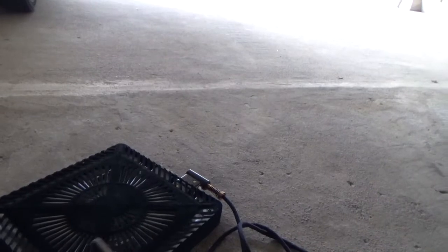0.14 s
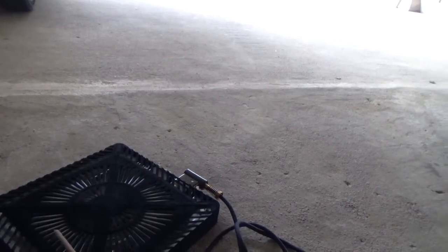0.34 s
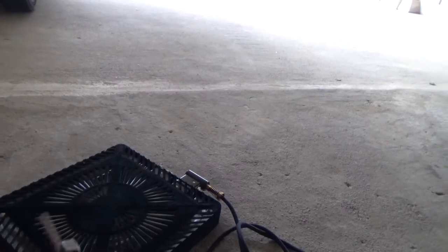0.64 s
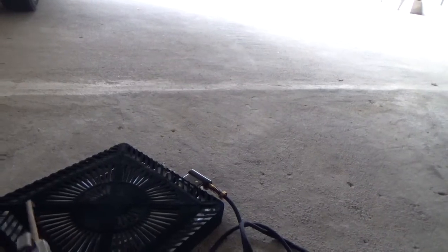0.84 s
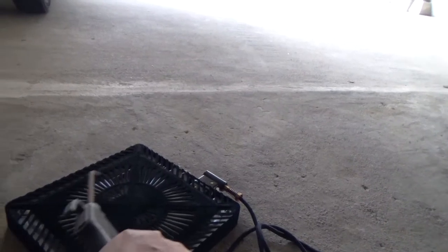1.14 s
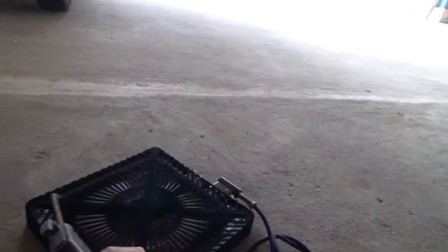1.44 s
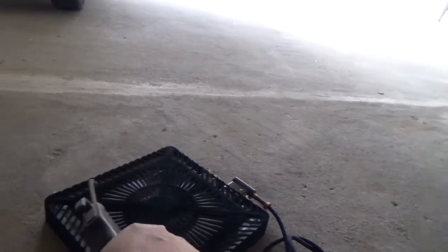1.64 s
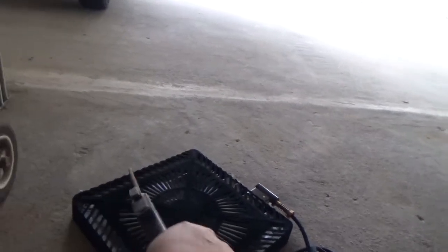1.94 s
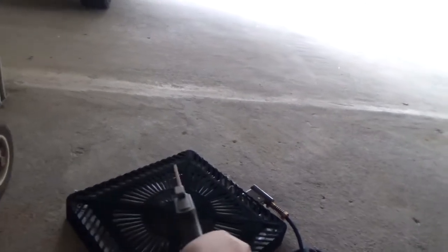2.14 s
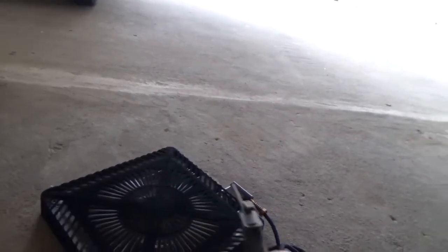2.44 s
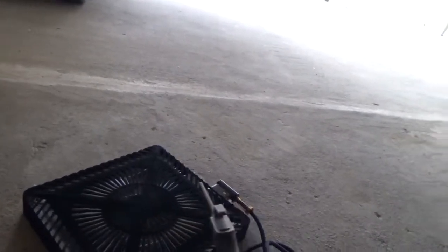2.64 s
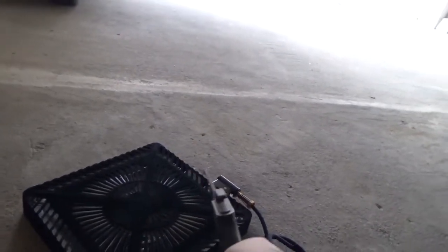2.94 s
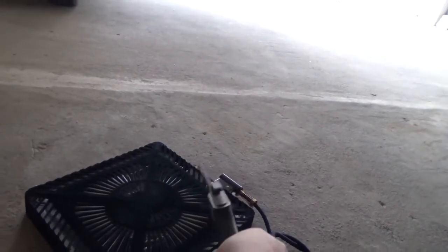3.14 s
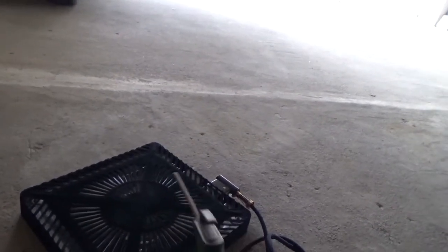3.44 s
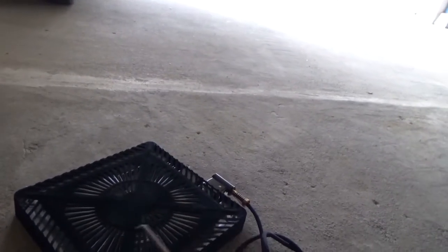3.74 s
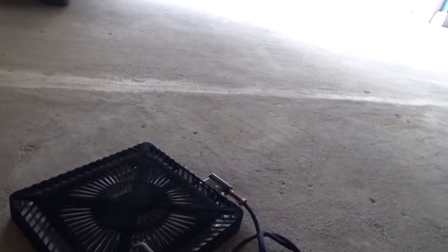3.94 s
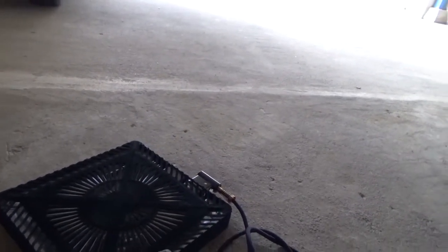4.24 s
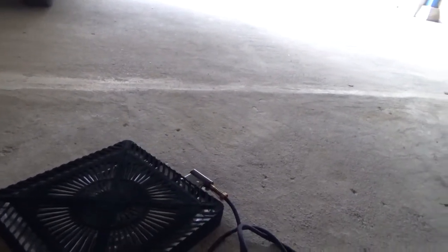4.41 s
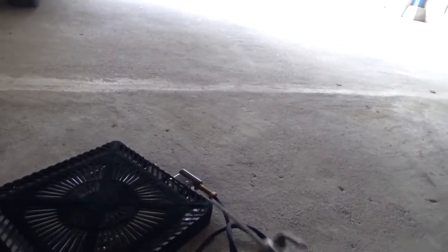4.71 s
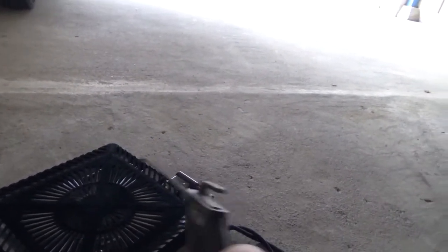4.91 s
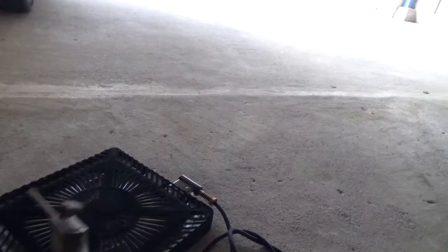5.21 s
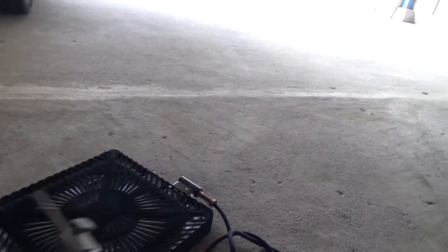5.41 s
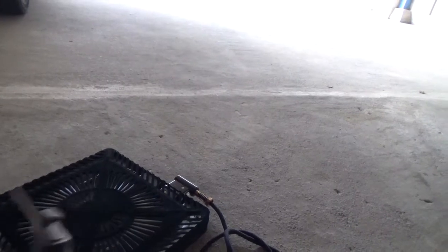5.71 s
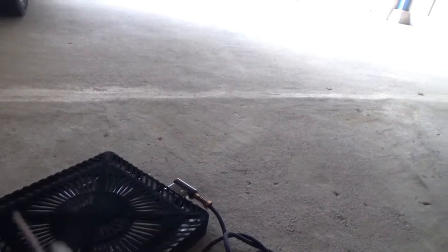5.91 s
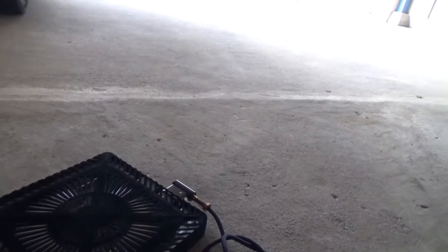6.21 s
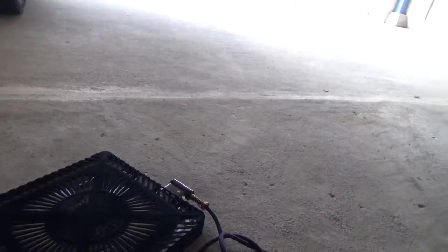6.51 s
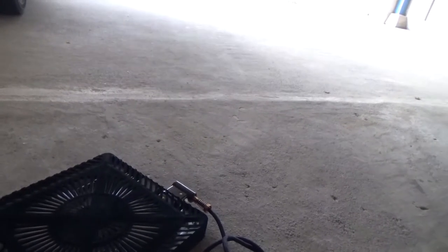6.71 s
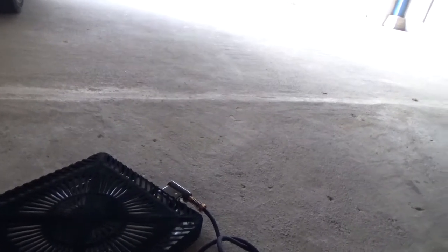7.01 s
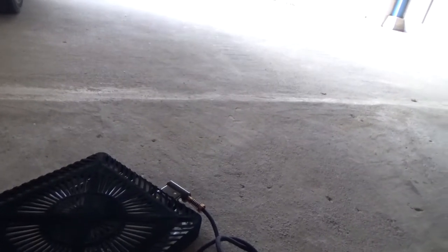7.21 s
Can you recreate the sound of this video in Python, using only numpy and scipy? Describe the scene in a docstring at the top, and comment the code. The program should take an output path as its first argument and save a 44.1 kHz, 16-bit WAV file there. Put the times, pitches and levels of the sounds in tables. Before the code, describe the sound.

Over a steadily chugging air compressor, a long, wavering blast of air hisses, stops briefly, then returns weaker.

```python
"""From the start a blow gun cleans a box fan on a garage floor, while a piston compressor chugs at
29 strokes a second. The turbulent jet hisses; swept over the fan, it rushes on the slats, excites
hollows of the housing, spits and briefly whistles on edges. At 6.6 s the trigger is let go, and at
6.9 s a weaker blast follows. Throughout, a gain control holds down the loud jet, so the compressor
ducks under the blasts."""
import sys
import numpy as np
from scipy import signal
from scipy.fft import rfft, irfft, next_fast_len
from scipy.io import wavfile
from scipy.ndimage import uniform_filter1d

SR = 44100
rng = np.random.default_rng(int(sys.argv[2]) if len(sys.argv) > 2 else 0)


def waveform_to_disk(signal):
    """Save audio, clipped to [-1, 1], as 16-bit WAV at the path in sys.argv[1]."""
    frames = np.transpose(np.atleast_2d(signal))
    scaled = np.clip(frames, -1, 1) * 32767
    samples = np.round(scaled).astype(np.int16)
    wavfile.write(sys.argv[1], SR, samples)


N = 324562
TIME = np.arange(N) / SR


def blow_gun():
    """Aerodynamic noise: turbulence radiates from the free jet and from the surfaces that it strikes."""
    # Spectra of free jet, slats, housing hollows and low roar: f/Hz, relative spectral density/dB
    jet = [(60, -63), (200, -67), (380, -23), (700, -21), (1100, -35), (1900, -25), (2600, -33),
           (3500, -46), (4500, -12.5), (6200, -6), (7400, 1.5), (8700, 4), (9800, 0.5), (10900, -5)]
    slats = [(60, -60), (200, -44), (380, -49), (700, -9), (1100, -26), (1900, -8.5), (2600, -3), (3500, 2),
             (4500, 2.5), (6200, 1.5), (7400, -3), (8700, -6.5), (9800, -22), (10900, -25)]
    hollow = [(200, -60), (700, -16.5), (1100, -5), (1450, -8), (1900, 0.5), (2600, -1), (3500, -3.5),
              (4200, -25), (7400, -5.5), (10900, -34)]
    roar = [(60, -38), (200, -22), (380, -9), (700, -5), (1100, 0), (1450, -2), (1900, -4), (2600, -5),
            (4500, -9), (8000, -9), (10900, -26)]
    # Slow drift as the hand moves the gun: t/s, hiss level/dB, fizz level re hiss/dB
    jet_levels = [(0, -12, 2.5), (.85, -12, 4), (1.1, -5.5, 1), (1.38, -8, 1), (1.5, -13, 3.5),
                  (1.9, -15, -1.5), (2.25, -10, 1), (2.8, -13.5, -0.5), (3.25, -14, -1), (3.68, -16, 3),
                  (3.95, -10, 1), (4.5, -12, 2.5), (4.78, -10, -2), (4.98, -20.5, 3), (5.8, -17.5, 7),
                  (6.1, -17.5, 3.5), (6.38, -23.5, 8.5), (6.95, -30, -4), (7.36, -29, -10)]
    # Quick swings toward (+) or away from (-) the listener: centre t/s, duration/s, level change/dB
    swings = [(.13, 0.074, 3), (.49, 0.13, 4.5), (.71, 0.06, 7.5), (1.26, 0.054, -11), (1.76, 0.078, -12.5),
              (1.987, 0.038, -8.5), (2.065, .06, 4), (2.205, 0.045, 3), (2.52, 0.19, -8), (2.64, 0.061, 6),
              (2.735, 0.04, 6), (2.875, 0.019, -7.5), (2.965, 0.041, 3), (3.115, 0.024, 4),
              (3.154, 0.016, -6), (3.316, 0.024, -11.5), (3.52, 0.083, 9), (3.765, 0.055, -8.5),
              (3.885, 0.075, 10.5), (4.08, 0.072, 13), (4.37, .07, -11), (4.82, 0.048, 8),
              (5.35, 0.073, 8.5), (5.52, 0.077, 9.5), (6.26, .055, 8.5)]
    # The jet meets the fan squarely (+) or slips off (-): centre t/s, duration/s, slats/dB, hollow/dB
    passes = [(.1, 0.29, 4.5, 2.5), (.43, 0.16, 0, -5), (.62, 0.21, 3, 1), (.89, 0.059, 6, 6.5),
              (1.12, 0.14, 1.5, 6.5), (1.38, .1, -2.5, -4), (1.6, 0.055, 2.5, -2), (1.8, 0.19, -7.5, -3),
              (1.98, .04, -7, -9), (2.125, 0.064, 6, 1), (2.25, .06, 3, 5), (2.52, 0.078, -7, 0),
              (2.805, 0.064, 7.5, -1), (3.1, 0.49, -4.5, -1), (3.315, 0.058, -5, -2), (3.45, .1, 0.5, 4),
              (3.67, 0.18, -5, 3.5), (3.98, 0.056, 4, 1), (4.21, 0.089, 3, 5.5), (4.44, 0.02, 4, 12.5),
              (4.58, 0.16, 1, 7.5), (4.82, 0.045, 5.5, 8), (4.985, 0.22, 4.5, 14), (5.19, .19, 12, 9.5),
              (5.445, 0.14, 8.5, 5.5), (5.655, 0.12, 14, 11.5), (5.765, 0.11, 8.5, 1),
              (5.875, 0.14, 12, 8.5), (6.175, 0.11, 5, 12.5), (6.33, 0.096, 5.5, 16), (6.96, .08, 0.5, -11),
              (7.2, 0.32, 3.5, 3)]
    # Direction of the jet: t/s, left-right level difference/dB
    jet_pan = [(0.0, 2.0), (0.59, 3), (2.75, 0.0), (4.43, 1.5), (4.65, 0), (5.35, 3), (6.89, 5),
               (6.97, 5.5), (7.36, 6)]
    level_db, fizz_db = in_time(jet_levels)
    swing_db, = sweeps(swings)
    slats_rise_db, hollow_rise_db = sweeps(passes)
    flow_db = valve_db()
    hiss_db = flow_db + level_db + swing_db
    change_db = level_db + swing_db + 13   # re the usual hiss of -13 dB; the fan follows it only in part
    layers = [(jet, hiss_db),
              (slats, flow_db - 22 + 0.65 * change_db + slats_rise_db),
              (hollow, flow_db - 30 + 0.5 * change_db + hollow_rise_db),
              (roar, flow_db - 33 + 0.24 * change_db + 0.32 * hollow_rise_db)]
    stream = turbulence(layers, ripple_db=1.67, ripple_hz=18, flutter_db=1.01, flutter_hz=40)
    stream = near_reflections(stream, first_ms=0.703, last_ms=6, strength=0.093, sway=0.082)
    fizz_band = signal.butter(8, [13000, 19000], "band", fs=SR, output="sos")
    fizz = unit_rms(signal.sosfilt(fizz_band, rng.standard_normal(N)))
    fizz *= from_db(flow_db + level_db + fizz_db + 0.77 * swing_db)
    whistles = from_db(hiss_db) * edge_tones(gain_db=-3, attack_s=0.0029, release_s=0.0055)
    return (stream + fizz + whistles) * stereo_gains(in_time(jet_pan)[0])


def valve_db(open_s=0.022, close_s=0.032, leak_db=-11):
    """Throttling: the flow rises linearly as the valve opens and decays exponentially to a leak."""
    # The trigger is held: start t/s, end t/s
    blasts = [(-0.1, 6.612), (6.911, 7.5)]
    opening = sum(np.clip((TIME - start) / open_s, 0, 1) * np.exp(-np.maximum(TIME - end, 0) / close_s)
                  for start, end in blasts)
    return 10 * np.log10(opening ** 2 + from_db(leak_db) ** 2)


def sweeps(rows, steepness=2.4):
    """Amplitude modulation: each hand movement is a bell in dB, its duration taken at half height."""
    centre, duration, *columns = np.transpose(rows)
    coarse = TIME[::100]
    distance = np.abs(2 * (coarse - centre[:, None]) / duration[:, None])
    bells = 0.5 ** (distance ** steepness)
    return [np.interp(TIME, coarse, db @ bells) for db in columns]


def turbulence(layers, ripple_db, ripple_hz, flutter_db, flutter_hz, count=24):
    """Incoherent noises add in power; the gaps that the jet crosses favour now one band, now another."""
    # Likeness of the air noise at the two ears: f/Hz, correlation coefficient
    coherence = [(100, .98), (500, 0.54), (1200, 0.74), (2500, 0.84), (6000, 0.86), (10000, .97)]
    edges = np.geomspace(800, 12400, count + 1) - 700
    centres, widths = np.sqrt(edges[1:] * edges[:-1]), np.diff(edges)
    shares = np.array([from_db(at_hz(spectrum, centres)) ** 2 * widths for spectrum, _ in layers])
    shares /= shares.sum(axis=1, keepdims=True)
    powers = np.array([from_db(db) ** 2 for _, db in layers])
    white, out = rng.standard_normal((2, 2, N)), np.zeros((2, N))
    for k in range(count):
        band = signal.butter(2, edges[k:k + 2], "band", fs=SR, output="sos")
        correlation = at_hz(coherence, centres[k])
        side_gain = np.sqrt((1 - correlation) / (1 + correlation))
        ripple = unit_rms(from_db(ripple_db * drift(ripple_hz)))
        gain = np.sqrt(shares[:, k] @ powers) * ripple
        out += unit_rms(signal.sosfilt(band, white[k % 2])) * gain * [[1], [side_gain]]
    mid, side = out * unit_rms(from_db(flutter_db * drift(flutter_hz)))   # slats chop the whole stream
    return np.array([mid + side, mid - side])


def edge_tones(gain_db, attack_s, release_s):
    """Resonance: turbulence drives one mode for as long as the jet stays on an edge or gap."""
    # Spits and whistles: start t/s, duration/s, f/Hz, bandwidth/Hz, relative level/dB
    resonances = [(.651, .023, 3480, 600, -6.5), (0.694, 0.065, 6920, 350, -2.5),
                  (0.8, 0.18, 7200, 300, -5.5), (1.432, 0.041, 4300, 2600, -0.5),
                  (1.479, 0.024, 4130, 900, -1), (2.121, 0.051, 2380, 900, -4.5),
                  (2.15, 0.088, 7700, 300, -5), (2.431, .012, 2920, 2400, 4),
                  (2.613, 0.017, 4250, 900, -1.5), (2.71, 0.039, 3800, 1800, -6.5),
                  (2.898, 0.47, 5500, 600, -13), (3.628, 0.085, 1350, 500, -11.5),
                  (4.003, 0.028, 6270, 500, -1), (4.37, 0.01, 6200, 1800, 11),
                  (4.944, 0.089, 1770, 200, -1.5), (4.961, 0.076, 2170, 200, -2.5),
                  (5.15, 0.1, 4460, 1200, 3), (5.294, 0.13, 6560, 400, -4.5), (5.618, .06, 4160, 1800, 5),
                  (5.832, 0.079, 4500, 1500, 3.5), (6.141, 0.078, 1710, 300, -2.5),
                  (6.216, 0.09, 7600, 350, -0.5), (6.302, 0.066, 1540, 140, 0),
                  (6.292, 0.11, 1870, 220, -2.5), (6.298, 0.068, 3280, 350, -1.5),
                  (6.897, 0.018, 2300, 1400, 11), (7.006, 0.1, 3850, 700, -9), (7.061, 0.24, 4400, 650, -7)]
    out = np.zeros(N)
    for start, duration, hz, width_hz, db in resonances:
        on = (TIME > start) & (TIME < start + duration)
        age = TIME[on] - start
        band = signal.butter(2, [hz - width_hz / 2, hz + width_hz / 2], "band", fs=SR, output="sos")
        tone = unit_rms(signal.sosfilt(band, rng.standard_normal(2 * SR)))[SR:SR + len(age)]
        envelope = np.tanh(age / attack_s) * np.tanh((duration - age) / release_s)
        out[on] += from_db(db + gain_db) * tone * envelope
    return out


def near_reflections(x, first_ms, last_ms, strength, sway, count=8):
    """Comb filtering: weak echoes off floor, fan and hand interfere; their delays slide with the gun."""
    out = x.copy()
    for k, delay_ms in enumerate(np.geomspace(first_ms, last_ms, count)):
        delay_s = delay_ms / 1000 * np.exp(sway * drift(corner_hz=0.4))
        echo = np.array([np.interp(TIME - delay_s, TIME, channel) for channel in x])
        out += (-1) ** k * strength * echo
    return out / np.sqrt(1 + count * strength ** 2)


def compressor(level_db, uneven_db, tick_db, tick_hz, tick_s, first_stroke_s=0.00772):
    """Periodic impulse excitation: each revolution gives one sharp gulp of air and a valve tick."""
    # Running speed: t/s, stroke rate/Hz
    speed = [(0, 28.8775), (2, 28.8756), (4, 28.8842), (6, 28.9032), (7.4, 28.9229)]
    # Garage reflections, the same after every stroke: delay/ms, signed amplitude ratio
    echoes = [(5.5, 0.39), (6.7, 0.11), (14.35, 0.13), (15.15, -0.036), (16.3, 0.26), (17.0, -0.17),
              (25.55, 0.099), (26.3, 0.42), (30.25, 0.051), (32.2, 0.21)]
    # Spectrum of one stroke: f/Hz, relative level/dB
    stroke_spectrum = [(29, -44), (60, -27), (115, -11.5), (200, -8), (290, -13), (370, 5.5), (720, 7),
                       (820, -15), (930, 4.5), (1100, -9.5), (1300, 2.5), (1600, -19), (2700, -8),
                       (5000, -56)]
    # Direction of the compressor: f/Hz, left-right level difference/dB
    pump_pan = [(150, 0), (340, 1), (590, 2.7), (1060, 4.5), (3300, 6)]
    start_hz = speed[0][1]
    turns = 1 + np.cumsum(in_time(speed)[0]) / SR - first_stroke_s * start_hz
    strokes = np.diff(np.floor(turns), prepend=0) * from_db(uneven_db * rng.standard_normal(N))
    reflected = sum(ratio * np.interp(TIME - ms / 1000, TIME, strokes, left=0) for ms, ratio in echoes)
    gulps = unit_rms(filtered(strokes + reflected, lambda hz: from_db(at_hz(stroke_spectrum, hz))))
    stroke_age = (turns % 1) / start_hz
    spurts = rng.standard_normal(N) * np.exp(-stroke_age / tick_s)
    ticks = unit_rms(signal.lfilter(*signal.iirpeak(tick_hz, Q=3.5, fs=SR), spurts))
    chug = from_db(level_db) * gulps + from_db(tick_db) * ticks
    return filtered(chug, lambda hz: stereo_gains(at_hz(pump_pan, hz)))


def whirr(level_db, side_db):
    """Stationary broadband noise of the compressor's motor and belt, spread by the garage."""
    # Motor and belt: f/Hz, relative spectral density/dB
    spectrum = [(25, -16), (60, -10), (120, -10), (250, -2), (380, 7), (750, 1.5), (1100, 7.5), (1600, -21),
                (2700, -12), (4500, -10), (11000, -31)]
    mid, side = unit_rms(filtered(rng.standard_normal((2, N)), lambda hz: from_db(at_hz(spectrum, hz))))
    return from_db(level_db) * (mid + from_db(side_db) * side * [[1], [-1]])


def from_db(db):
    """Amplitude ratio of a level."""
    return 10 ** (np.asarray(db) / 20)


def unit_rms(x):
    """Normalisation to a mean power of one."""
    return x / np.sqrt(np.mean(x ** 2) + 1e-20)


def in_time(rows):
    """Linear interpolation of each column over time."""
    times, *columns = np.transpose(rows)
    return [np.interp(TIME, times, column) for column in columns]


def at_hz(points, hz):
    """Interpolation on a logarithmic frequency axis."""
    f, value = np.transpose(points)
    return np.interp(np.log(np.maximum(hz, 1)), np.log(f), value)


def filtered(x, response):
    """Zero-phase filtering: the spectrum is multiplied by a real gain."""
    size = next_fast_len(N + SR // 10)
    return irfft(rfft(x, size) * response(np.fft.rfftfreq(size, 1 / SR)), size)[..., :N]


def stereo_gains(db):
    """Amplitude panning: left and right gains for a level difference."""
    return from_db(np.array([db, -db]) / 2)


def drift(corner_hz, step=40):
    """Slow random fluctuation: low-passed noise of unit RMS."""
    pole = np.exp(-2 * np.pi * corner_hz * step / SR)
    noise = rng.standard_normal(N // step + 2002)
    slow = signal.lfilter([1], [1, -2 * pole, pole ** 2], noise)[2000:]   # once the filter has settled
    return np.interp(np.arange(N) / step, np.arange(len(slow)), unit_rms(slow))


def scene():
    """Superposition of the blow gun and the running compressor behind it."""
    pump = compressor(level_db=-35, uneven_db=0.74, tick_db=-50, tick_hz=2540, tick_s=0.0034)
    return blow_gun() + pump + whirr(level_db=-47, side_db=-20)


def record(dry):
    """Automatic gain control: gain falls as short-term power rises. A steep low-pass removes the fizz."""
    ceiling_db, window_s, cutoff_hz = -13.5, 0.018, 11080
    power = uniform_filter1d(dry.mean(axis=0) ** 2, int(window_s * SR))
    held = dry / np.sqrt(1 + power / from_db(ceiling_db) ** 2)
    return filtered(held, lambda hz: np.clip((cutoff_hz - hz) / 100 + 0.5, 0, 1))


dry = scene()
out = record(dry)
waveform_to_disk(out)
```